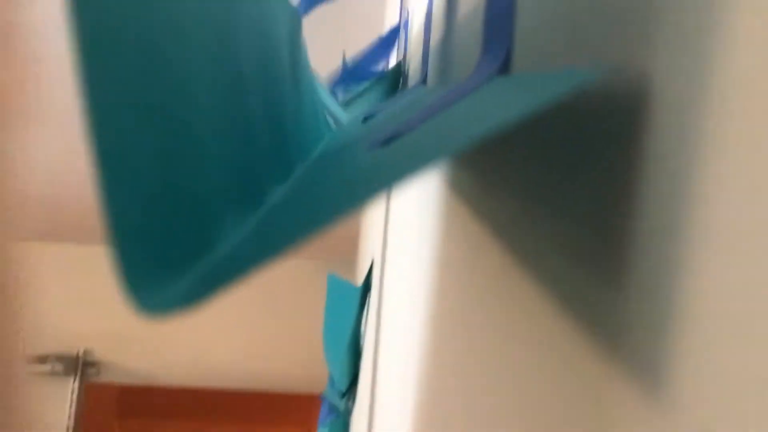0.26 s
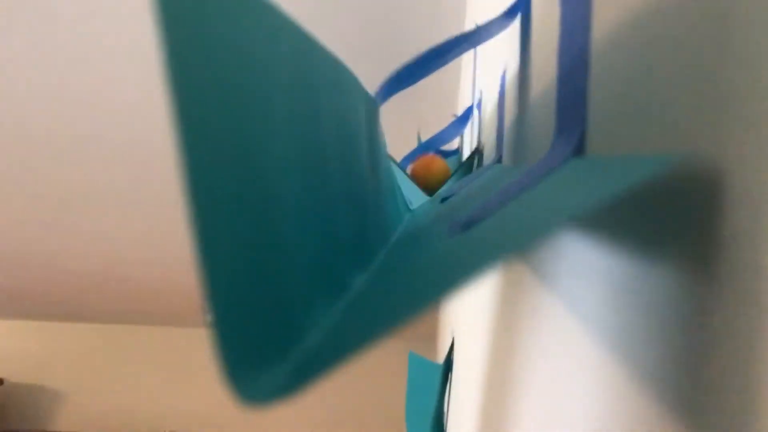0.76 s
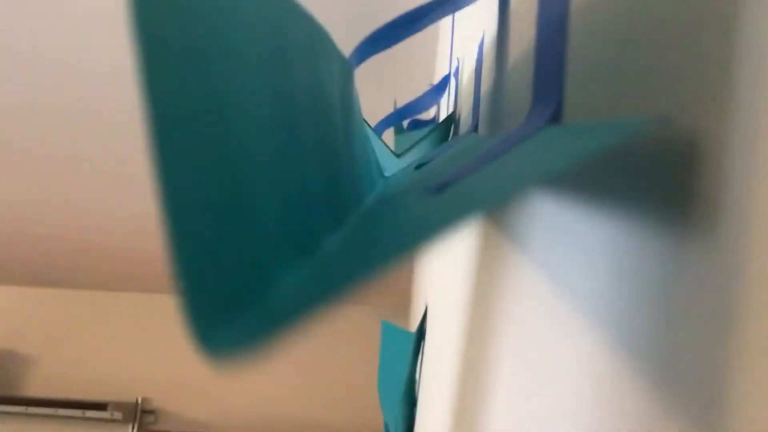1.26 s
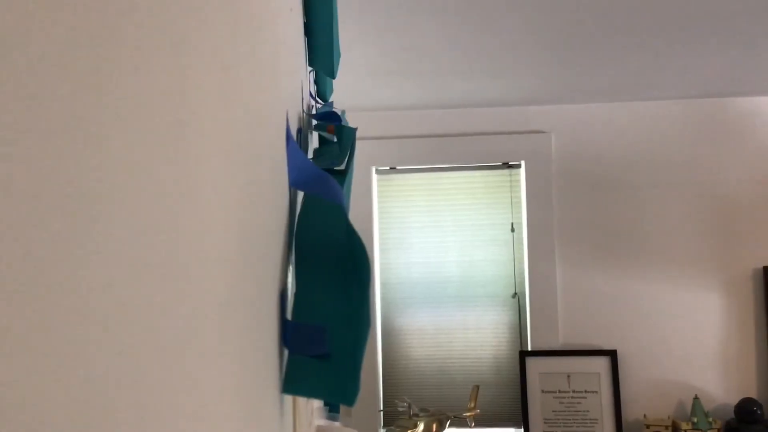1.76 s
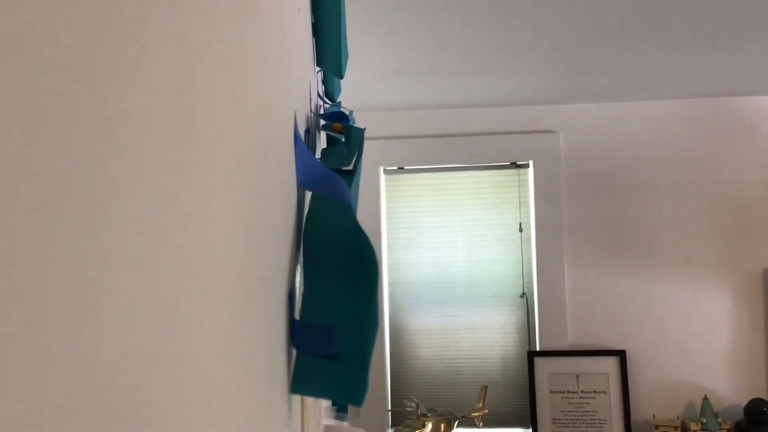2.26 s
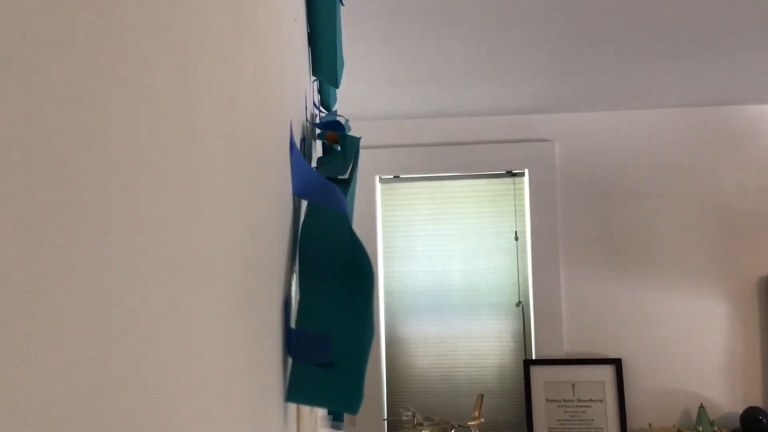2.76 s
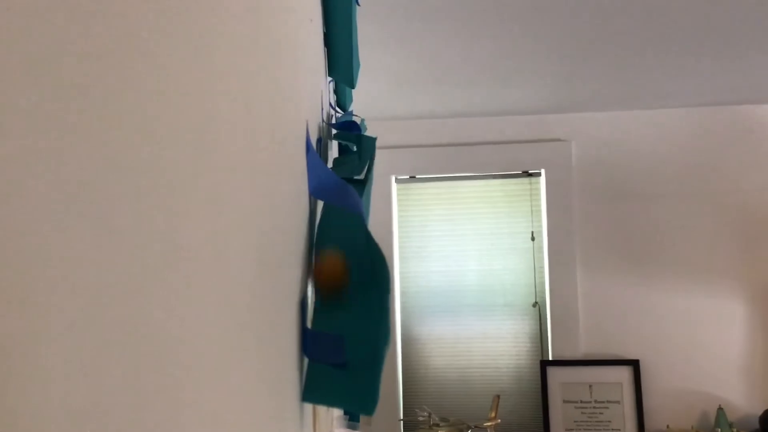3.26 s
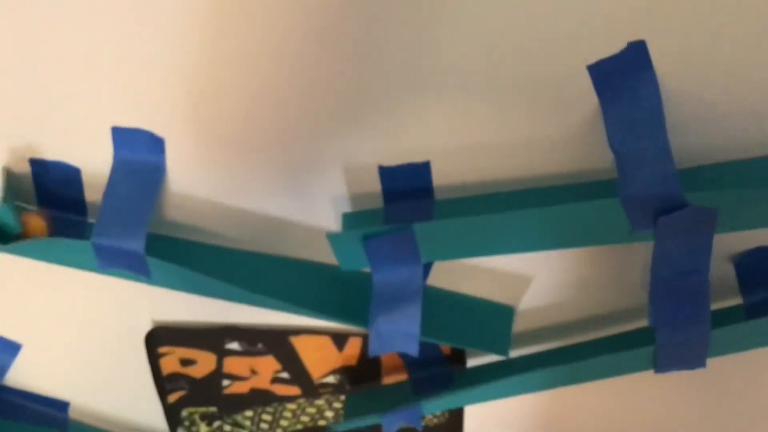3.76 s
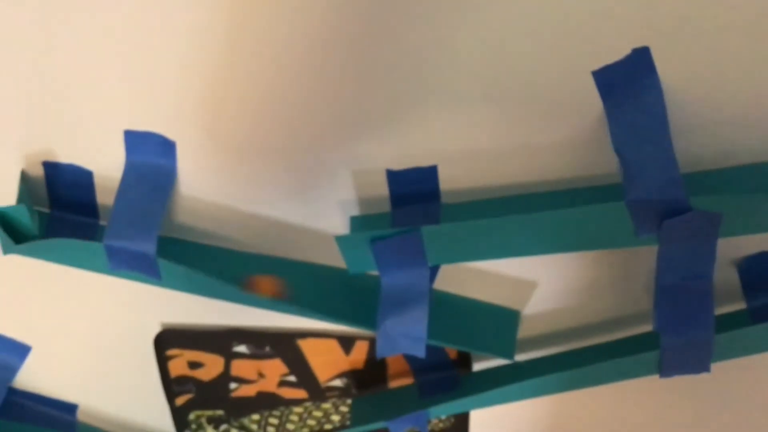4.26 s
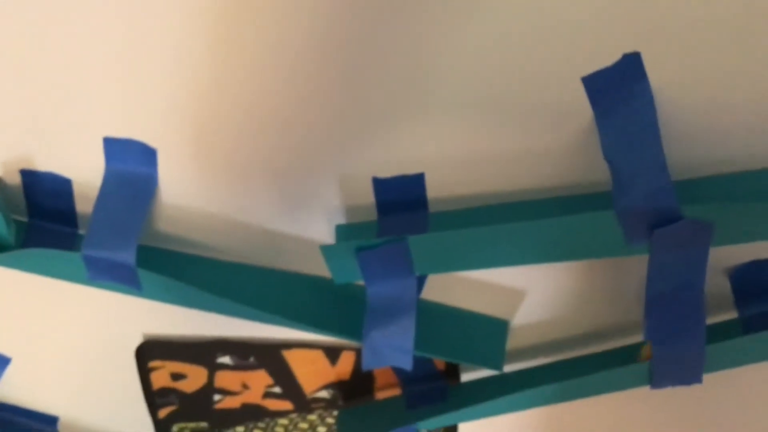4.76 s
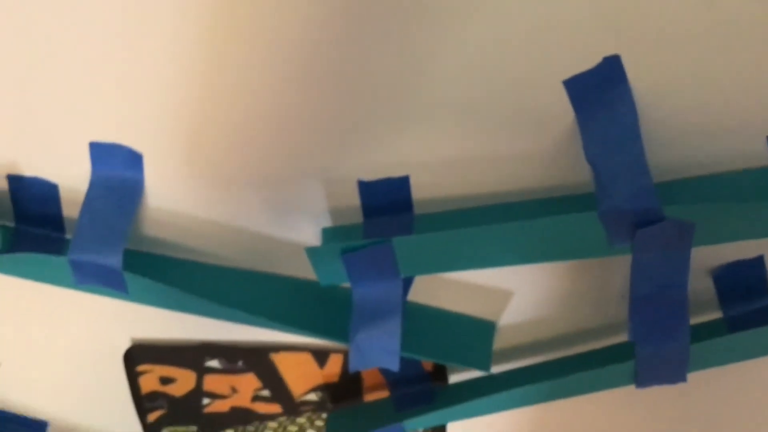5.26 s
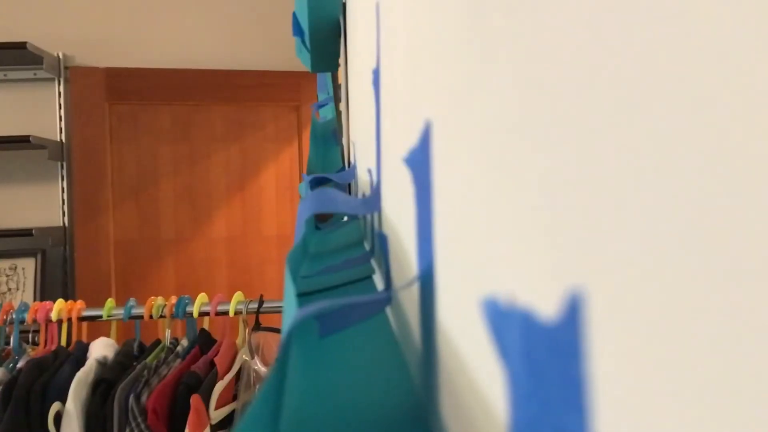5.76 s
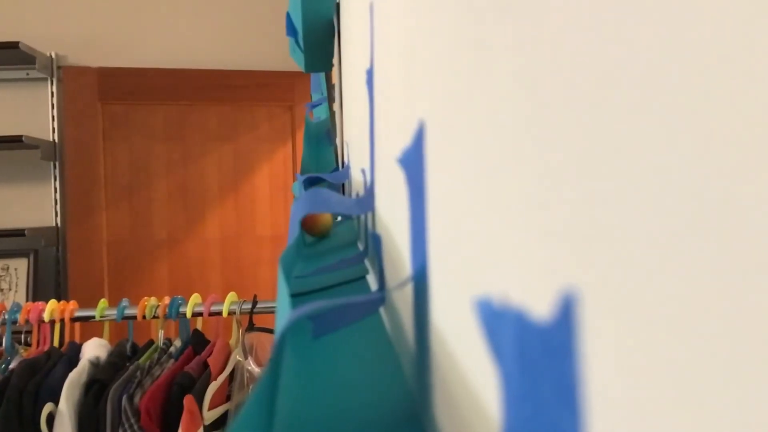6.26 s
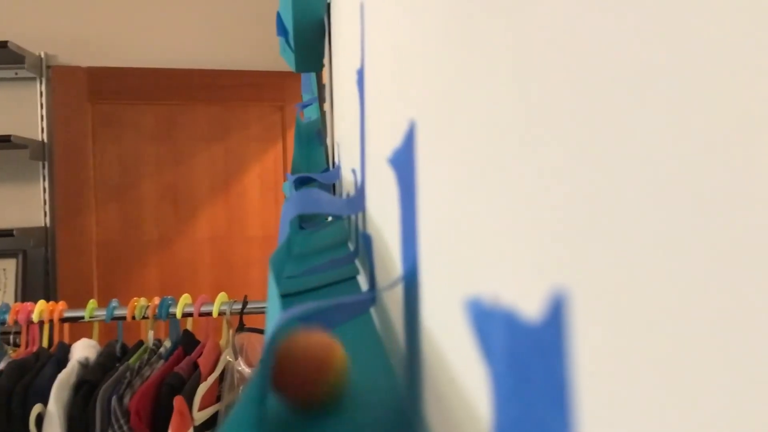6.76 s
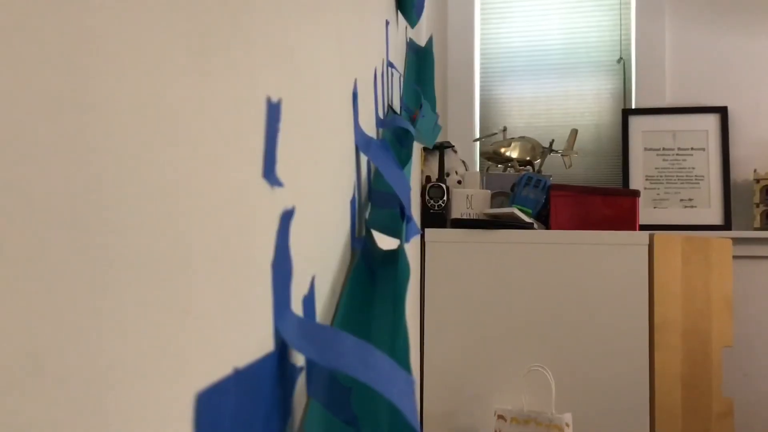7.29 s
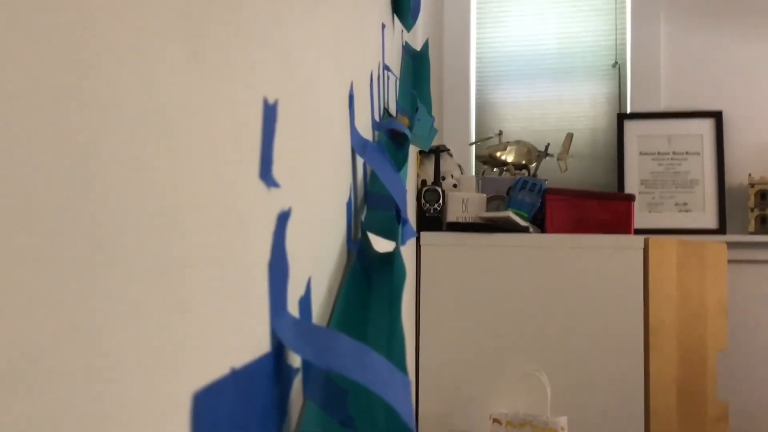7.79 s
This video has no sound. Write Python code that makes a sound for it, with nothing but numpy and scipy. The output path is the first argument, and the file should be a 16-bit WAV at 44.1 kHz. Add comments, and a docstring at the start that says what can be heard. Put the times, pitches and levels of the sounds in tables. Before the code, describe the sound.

A small marble runs down a homemade paper track in a small, dry room. Crisp slaps and pops come first, rolling swells toward the close microphone and ends in a hard knock. After a few more slaps it grows nearly silent, then taps, dense clattering, sparse drops and a last rumbling approach follow. Faint bass air and hum lie beneath.

```python
"""Marble on a paper track

A marble runs down a paper track taped to the wall of a small room, now near, now far from the microphone.
Rolling is coloured noise; folds and lower ramps give noisy slaps; taps, bright pops and a hard knock
at the microphone use fading sine waves. Skids, one faint ringing tap and dull bumps shake a resonance.
Noise for still air and a faint mains hum lie underneath."""
import sys
import numpy as np
from scipy import signal
from scipy.fft import rfft, irfft, next_fast_len
from scipy.io import wavfile
from scipy.ndimage import map_coordinates

SR = 44100
rng = np.random.default_rng(int(sys.argv[2]) if len(sys.argv) > 2 else 0)


def log_audio(samples):
    """Write samples as a 16-bit WAV file to the path given in sys.argv[1]."""
    # one column per channel
    frames = np.atleast_2d(samples).T
    # limit to full scale, then quantise
    limited = np.clip(frames, -1, 1)
    pcm = np.round(limited * 32767).astype(np.int16)
    wavfile.write(sys.argv[1], SR, pcm)


N = 354123  # length in samples

# How loudly the marble rolls, one list of points for each stretch of track.
# Each point: time in seconds, basic rolling level in dB.
ROLL_CURVES = [
    [(0.0, -58.5), (0.16, -81.5), (0.3, -61.5), (0.658, -66.5), (0.856, -62.5), (.93, -56.5), (1.016, -53),
     (1.1, -47.5)],
    [(1.17, -48), (1.204, -68.5), (1.268, -66), (1.586, -65.5), (1.65, -65.5), (1.766, -70.5), (1.816, -77),
     (1.95, -86)],
    [(2.0, -87), (2.276, -80), (2.606, -75), (2.84, -68.5), (2.996, -69.5), (3.058, -65.5), (3.196, -50),
     (3.33, -100)],
    [(3.37, -65.5), (3.5, -76), (3.622, -62), (3.662, -56), (3.748, -69), (3.876, -66.5), (4.02, -78)],
    [(4.06, -76.5), (4.178, -73.5), (4.39, -66), (4.658, -80.5), (4.968, -69.5), (5.11, -68.5),
     (5.242, -65.5), (5.31, -66.5)],
    [(5.36, -69), (5.554, -76.5), (6.032, -70), (6.12, -65.5), (6.385, -70.5), (6.46, -61.5), (6.66, -61),
     (6.852, -54.5), (6.91, -51)],
    [(6.94, -74), (7.09, -64), (7.592, -75.5), (7.8, -69), (7.932, -69), (8.03, -72)],
]
# Tone of each stretch. Each row: rumble of the flexing paper in dB, fibre hiss in dB, both before the level.
STRETCH_TONES = [(4, -8), (4, -7), (4, -7), (-4, -18.5), (1.5, -11.5), (4, -12.5), (1.5, -5)]
# The marble hops or drops and leaves the paper. Each row: start in seconds, end in seconds.
# A row that ends well before it starts has no effect, here and among the panels.
FLIGHT_TIMES = [(1.098, 1.265), (1.383, 1.54), (3.029, 3.21), (3.4, 3.22), (4.435, 4.46), (5.052, 5.12),
                (6.925, 7.2)]
# Panel resonances of the ramp under the marble. Each row: start in seconds, end in seconds, pitch in Hz,
# sharpness (Q), strength of the added ring in dB.
RAMP_PANELS = [(0.736, 1.06, 7900, 2.1, 7), (1.4, 1.801, 620.5, 6.8, -1.5), (4, 4.5, 635, 6.6, -8),
               (2.9, 5.315, 4680, 9.1, 8.5), (3.7, 4.56, 1830, 5.5, -0.5), (4.604, 5.317, 2190, 7.3, 5),
               (2.9, 4.4, 2240, 6.7, -2), (5.424, 5.844, 1100, 2.6, 0), (5.4, 6.742, 5200, 2.4, 3),
               (7, 6.92, 7100, 4.5, -2), (6.6, 8.03, 1460, 8.7, -3.5)]
# The marble slaps into a fold or lands on a ramp. Each row: start in seconds, strength in dB,
# crisp edge in dB, low body in dB, ring of that panel in Hz, time to fade by 60 dB in seconds.
SLAP_EVENTS = [(0.1781, -40.5, 0, -2, 5200, 0.075), (0.2116, -27, 1.5, -5.5, 5550, 0.041),
               (.2304, -38, -1, -1, 4800, .04), (0.2427, -33.5, -3, -5, 2730, .06),
               (0.3261, -40, 1, 1.5, 5330, 0.055), (0.381, -51.5, 5.5, -9, 5700, 0.044),
               (.429, -50.5, 1, 0, 2700, 0.069), (.568, -51, 3.5, -8, 4100, 0.04),
               (0.668, -51.5, 4.5, -18, 5000, .06), (0.7968, -37.5, 0, -4, 5230, 0.074),
               (1.1947, -35.5, 4, -2, 5700, 0.046), (1.1984, -27, -8, 2, 3130, 0.05),
               (1.4191, -41, -3, -6.5, 3700, .06), (1.4232, -31, -7, -6, 1500, .05),
               (1.431, -33.5, -2, -4, 3900, 0.093), (1.5493, -44.5, -4, -1, 4330, 0.064),
               (1.6008, -33, -0.5, -2, 4400, 0.057), (1.6933, -47.5, -2, -2.5, 4600, 0.16),
               (2.7339, -52, 3, -3, 3500, 0.047), (3.088, -44, -3, -0.5, 2020, 0.067),
               (3.13, -50, 5.5, -4, 5020, 0.13), (3.2435, -44, -4.5, -9, 5000, 0.065),
               (3.2595, -46.5, -2, -2, 4800, 0.045), (3.3522, -57, -1, 5.5, 2500, 0.038),
               (3.43, -22, -7, -4, 2120, 0.056), (3.497, -42.5, -8, -2.5, 1550, 0.088),
               (3.5651, -32, -8.5, -3, 1800, 0.065), (3.578, -40, -16, 3, 1500, 0.04),
               (3.5895, -32.5, -18, -3.5, 1600, 0.08), (3.6183, -31.5, -17, -2, 2120, 0.044),
               (3.6832, -43, 0, -11, 4300, 0.071), (3.698, -38, 3, -3, 4080, 0.05),
               (3.709, -35.5, -7, -2, 2120, .07), (3.7392, -29, -2.5, -10.5, 4380, 0.053),
               (3.7553, -41.5, -6, -8, 2060, 0.072), (3.7809, -34, -1, -5.5, 4420, 0.048),
               (3.8256, -40, -2.5, -2.5, 4110, 0.099), (3.869, -40, -1.5, -5, 4570, 0.068),
               (4.0699, -50, -3.5, -5.5, 4130, 0.057), (4.1885, -45.5, -8.5, -4, 1840, .05),
               (4.246, -50.5, -6, -2, 1756, 0.055), (4.461, -29, -10, -4.5, 2054, 0.066),
               (4.5438, -48.5, -8, -1, 2050, 0.094), (4.616, -53.5, -4, -2, 4800, 0.049),
               (4.7366, -49.5, -4.5, -10.5, 1810, .06), (4.7625, -53.5, 3.5, -8.5, 4650, .045),
               (5.1312, -32.5, -5, -5.5, 2240, 0.057), (5.141, -22.5, -15.5, -10, 2175, 0.045),
               (5.153, -28, -2.5, -4.5, 2240, 0.026), (5.17, -53, 1, -1, 2150, 0.38),
               (5.2569, -34.5, -4.5, -5, 2250, 0.062), (5.676, -51.5, -5.5, -0.5, 1406, 0.056),
               (6.4, -54, -9, 2, 4500, 0.058), (6.754, -45, 2, 1, 4500, 0.035),
               (6.7939, -41, -4.5, 2, 1200, 0.043), (6.8425, -35.5, -8, 2.5, 1560, 0.045),
               (6.8697, -38.5, -7, -3, 1845, 0.044), (6.9926, -36, -1, -5, 3400, 0.088),
               (6.9987, -32, -4.5, -4.5, 3360, 0.11), (7.1432, -44, -9, -6, 2255, 0.076),
               (7.303, -49.5, -2, 2, 1430, .04), (7.316, -50, -4, 2, 2300, 0.038),
               (7.171, -54.5, -3, -5.5, 2300, 0.073), (7.24, -64, -4, -6, 3500, 0.056),
               (5.025, -57, 2, -6, 2200, .07), (.305, -48, 3, -8, 5200, 0.041),
               (7.9615, -58.5, 7.5, -2, 4000, 0.053), (7.98, -43.5, 1.5, -6.5, 3240, 0.054)]
# The marble taps paper lying firmly on the wall. Each row: start in seconds, strength in dB, starting pitch in Hz.
TAP_EVENTS = [(1.2472, -35.5, 1750), (2.785, -27, 2980), (2.9058, -35.5, 2740), (3.1997, -40, 1880),
              (3.37, -47.5, 2940), (8.0069, -26, 2750)]
# Creases pop under the marble; the rows at 2.785 s and 8.007 s are the bright tick that starts a tap.
# Each row: start in seconds, peak in dB before the room, pitch in Hz.
POP_EVENTS = [(.178, -34, 6400), (0.213, -15, 4300), (0.3038, -35, 7000), (0.3434, -38, 6500),
              (0.605, -48, 5960), (0.6393, -48, 6000), (0.796, -32, 5300), (.809, -27, 4970),
              (.86, -43, 8000), (1.1999, -19.5, 4350), (1.6025, -29.5, 4418), (3.636, -43, 6000),
              (6.615, -43, 6050), (6.7543, -45, 6000), (6.8439, -32, 4500), (7.0998, -45, 7000),
              (7.3027, -42, 6960), (7.374, -55, 5990), (7.8321, -52.5, 6570), (2.785, -37.5, 3900),
              (4.6165, -51, 4590), (4.664, -48, 4030), (8.007, -31, 3870)]
# Skids of the marble on the paper, and one faint ringing tap at 7.477 s.
# Each row: start in seconds, strength in dB, pitch in Hz, 60 dB fade in seconds.
SKIDS_AND_FAINT_TAP = [(.768, -46.5, 6100, 0.094), (.872, -46, 7040, 0.054), (1.222, -51, 6980, 0.12),
                       (3.15, -56, 5840, 0.1), (3.686, -47, 10800, 0.092), (7.477, -55.5, 1420, 0.07),
                       (7.719, -50.5, 6900, 0.022)]
# Dull bumps. Each row: start in seconds, strength in dB, pitch in Hz, 60 dB fade in seconds.
BUMP_EVENTS = [(.233, -35, 227, 0.077), (.306, -43, 245, 0.054), (.79, -40, 253, 0.18),
               (.812, -43, 113.5, 0.28), (1.017, -30.5, 174.6, 0.16), (1.119, -29.5, 405, 0.076),
               (1.2, -26, 210, 0.042), (2.447, -37.5, 214.8, 0.26), (2.463, -39, 480, 0.17),
               (2.46, -48, 990, 0.11), (3.578, -41.5, 301.5, .1), (2.788, -42, 737, .07),
               (4.188, -47.5, 331, .039), (4.463, -40, 400, 0.084), (5.141, -32.5, 382, 0.048),
               (5.258, -36.5, 390, 0.064), (5.337, -55, 339.3, 0.13), (6.025, -40, 179.3, 0.056),
               (6.095, -50, 175, 0.14), (6.172, -49, 231, .05), (6.415, -47, 125.3, 0.1),
               (6.46, -49, 130, 0.06), (6.536, -43.5, 168, 0.058), (6.568, -44, 259, 0.13),
               (6.69, -43, 104, 0.15), (6.73, -35, 138, 0.079), (6.797, -39, 330, 0.075),
               (6.846, -34.5, 139.5, 0.17), (7.66, -54, 260, 0.071), (7.668, -42.5, 72, 0.29),
               (7.779, -49.5, 427, .05)]
# Tones of the hard knock at the microphone. Each row: pitch in Hz, strength in dB.
KNOCK_TONES = [(68, -19), (128, -11), (275, -5.5), (570, 3), (740, -0.5), (980, -4.5), (1560, -10),
               (1900, -5), (2740, -8), (3800, -4), (5400, -4.5), (7100, -6.5), (8300, -2.5), (10600, -21),
               (15000, -18)]
# Colour of a slap. Each row: frequency in Hz, filter gain in dB.
SLAP_COLOUR = [(41, -35), (70, -3.5), (344, -2), (700, -2), (880, -9), (1150, -10), (1550, -8), (2220, -7),
               (2600, -10.5), (3100, -14), (3900, -11.5), (4690, -12.5), (6450, -18.5), (10200, -24.5),
               (12800, -27.5), (16000, -28.5)]
# Colour of rolling. Each row: frequency in Hz, filter gain in dB.
ROLLING_COLOUR = [(31, -44.5), (52, -13.5), (157, -6.5), (292, -10), (354, -6.5), (419, -15), (660, -12),
                  (880, -18), (1420, -20.5), (2190, -22), (6280, -29.5), (16000, -47.5)]
# Colour of still air. Each row: frequency in Hz, filter gain in dB.
AIR_COLOUR = [(25, -31), (50, -12), (75, -4.5), (120, -7), (200, -13), (300, -17.5), (500, -29.5),
              (1000, -35.5), (2500, -41), (6000, -46.5), (10000, -45.5), (16000, -53.5)]
# How long the room rings. Each row: frequency in Hz, 60 dB fade in seconds.
ROOM_FADES = [(100, .35), (500, 0.3), (2500, 0.3), (6000, 0.39), (14000, 0.26)]
# Level of air and hum over time. Each row: time in seconds, gain in dB.
BACKGROUND_LEVELS = [(3.3, 0), (3.449, -1.5), (6.9, -0.5), (7.0, -6)]
# The level dips briefly. Each row: centre in seconds, half width in seconds, gain at the centre in dB.
LEVEL_DIPS = [(1.267, 0.014, -20), (5.324, 0.0076, -24.5), (6.942, 0.018, -21)]

# Rolling
RUB_DB = 1  # gain of the whole rolling sound over its basic level
RUMBLE_GROWS, PIVOT_DB = 1.15, -65  # dB of rumble per dB of rolling, about this level
FLIGHT_DB, LIFT_OFF_S = -13, 0.066  # rolling changes by this much in flight, with a fade this long
SWELL_DB, SWELLS_PER_S = 0.58, 11  # the marble weaves from wall to wall

# Slaps
SLAP_DB = -5  # gain of every slap
RATTLE_DB, RATTLE_T60_S = -25, 0.18  # loose paper rattles on after a slap
REBOUND_S, REBOUND_DB = 0.0096, -10  # the sheet springs back against the marble
PANEL_DB = -1  # the panel's ring, relative to the slap

# Small contacts on the way
TICKS_PER_S, TICK_DB, TICK_SPREAD_DB = 14, 9, 3.5  # strength over the rolling level, plus or minus the spread
TICK_HZ, TICK_PITCH_SPREAD = 2000, 0.45  # each rings a different panel; spread in natural-log units
TICK_EDGE_DB, TICK_BODY_DB = 0, -2.5  # crisp edge and low body
TICK_T60_S = .025  # light contacts die sooner than slaps

# The sheet's many weak modes swell and fade as the marble moves along it
MODES_LOW_HZ, MODES_HIGH_HZ, MODE_Q = 467, 7230, 6.8
MODE_CHANGES_PER_S = 7
ROLL_SWING, SLAP_SWING = 0.32, 0.22  # how much the modes colour the rolling and the slaps

# Taps, pops and soft-edged strokes
TAP_FALL_S, TAP_T60_S = 0.00432, 0.015  # time scale of the falling pitch, fade
ECHO_DB, ECHO_T60_S = -6, 0.043  # scatter in the wall after a tap
POP_T60_S, CRACKLE_T60_S, CRACKLE_DB = .0022, 0.0059, -10
RISE_SHARE = 0.077  # the longer a stroke lasts, the softer it starts

TOP_HZ = 16200  # band limit of the recorder


def amp(db):
    """Turn decibels into gain."""
    return 10 ** (np.asarray(db) / 20)


def unit(x):
    """Scale x to an average power of one (rms 1)."""
    return x / np.sqrt(np.mean(x ** 2) + 1e-20)


def along(points, hz):
    """Read (Hz, value) points on a log frequency axis."""
    point_hz, values = np.transpose(points)
    return np.interp(np.log(hz + 1), np.log(point_hz + 1), values)


def clock(count):
    """Time of each sample in seconds."""
    return np.arange(count) / SR


def dying(t, t60):
    """Fade exponentially, reaching 60 dB down at t60 seconds."""
    return np.exp(-np.log(1000) * t / np.maximum(t60, 1e-4))


def during(start, end, fade_s):
    """Give 1 between two times and 0 outside, with short fades."""
    t = clock(N)
    inside_s = np.minimum(t - start, end - t)
    return np.clip(inside_s / fade_s + .5, 0, 1)


def wobble(rate, count=N):
    """Draw a smooth random curve through rate random points a second."""
    points = rng.standard_normal(int(count * rate / SR) + 4)
    return map_coordinates(points, [clock(count) * rate])


def add(track, s, sound):
    """Mix a sound into the track at s seconds, cutting it at the track's end."""
    part = track[max(round(s * SR), 0):][:len(sound)]
    part += sound[:len(part)]


def coloured(x, spectrum):
    """Filter x to the given (Hz, dB) shape without any sound ahead of its cause."""
    m = 2 * next_fast_len(len(x))
    gain = amp(along(spectrum, np.fft.rfftfreq(m, 1 / SR)))
    # folding the cepstrum forward in time makes the filter minimum phase
    cepstrum = irfft(np.log(gain + 1e-6))
    cepstrum[1:m // 2] *= 2
    cepstrum[m // 2 + 1:] = 0
    return irfft(rfft(x, m) * np.exp(rfft(cepstrum)))[:len(x)]


def resonance(x, hz, q):
    """Pass x through one resonance; a higher q rings longer."""
    b, a = signal.iirpeak(min(hz, SR / 3), max(q, 1), fs=SR)
    return signal.lfilter(b, a, x)


def registers(x, low_hz, high_hz):
    """Split x into its low, middle and high part."""
    bands = [(low_hz, "low"), ([low_hz, high_hz], "band"), (high_hz, "high")]
    return [signal.sosfilt(signal.butter(3, hz, kind, fs=SR, output="sos"), x) for hz, kind in bands]


def grains(count, per_second, smooth):
    """Make tiny random contacts over a smooth share of noise, at rms 1."""
    hits = (rng.random(count) < per_second / SR) * rng.standard_normal(count)
    return unit(unit(hits) + smooth * rng.standard_normal(count))


def rolling_level():
    """Level of the rolling in dB; it falls away while the marble is in the air."""
    airborne = sum(during(start, end, LIFT_OFF_S) for start, end in FLIGHT_TIMES)
    seconds, level_db = np.transpose(np.concatenate(ROLL_CURVES))
    return np.interp(clock(N), seconds, level_db) + FLIGHT_DB * airborne


def rolling(level_db):
    """The marble rides over the grain of the paper; the sheet flexes under it in lumps."""
    ends = [point[0] for stretch in ROLL_CURVES for point in (stretch[0], stretch[-1])]
    rumble_db, fibre_db = [np.interp(clock(N), ends, np.repeat(db, 2)) for db in np.transpose(STRETCH_TONES)]
    rumble_db = rumble_db + (RUMBLE_GROWS - 1) * (level_db - PIVOT_DB)
    force = amp(1.1 * wobble(130))
    swell = amp(SWELL_DB * wobble(SWELLS_PER_S))
    creases = .38 * grains(N, per_second=30, smooth=0)  # the odd sharper tick
    grain = grains(N, per_second=3400, smooth=0.93)
    paper = coloured(force * (grain + creases), ROLLING_COLOUR)
    rumble, rub, fibre = map(unit, registers(paper, low_hz=930.0, high_hz=3550))
    lumps = unit(amp(3 * wobble(60)))
    lower = swell * (amp(rumble_db) * lumps * rumble + rub)
    hiss = np.sqrt(swell) * amp(fibre_db) * fibre  # the hiss swells less
    return amp(level_db + RUB_DB) * (lower + hiss)


def slap(edge_db, body_db, ring_hz, t60):
    """One contact snaps the paper, which springs back and chatters against marble and wall while its panel rings."""
    t = clock(count=8192)
    give = 1 - np.exp(-t / 0.00067)  # the paper yields before it snaps
    snap = give * (dying(t, t60) + 0.97 * dying(t, 0.0099))
    rebound = np.interp(t - REBOUND_S * rng.uniform(.8, 1.2), t, snap)
    envelope = np.hypot(snap, amp(REBOUND_DB) * rebound)
    rattle = amp(RATTLE_DB) * grains(len(t), per_second=400, smooth=0) * dying(t, RATTLE_T60_S)
    sheet = coloured(grains(len(t), per_second=5000, smooth=0.5) * envelope + rattle, SLAP_COLOUR)
    sheet = sheet + amp(PANEL_DB) * resonance(sheet, ring_hz, q=6.7)

    def chattering(part):
        """After the snap each register chatters in its own way."""
        return unit(part * amp(3.5 * wobble(220, count=len(t)) * (1 - dying(t, .06))))

    body, middle, edge = [chattering(part) for part in registers(sheet, low_hz=900, high_hz=3600)]
    size = amp(SLAP_DB) * np.sqrt(np.mean(envelope ** 2))
    return size * (amp(body_db) * body + middle + amp(edge_db - 2.1) * edge)


def contacts():
    """The marble hits the folds and lands on lower ramps, each time with a slap of the sheet."""
    out = np.zeros(N)
    for s, db, edge_db, body_db, ring_hz, t60 in SLAP_EVENTS:
        add(out, s, amp(db) * slap(edge_db, body_db, ring_hz, t60))
    return out


def ticks(level_db):
    """Small chance contacts with the side walls grow and shrink with the rolling."""
    out = np.zeros(N)
    for when, force, pitch in rng.random((round(TICKS_PER_S * N / SR), 3)):
        at = int(when * N)
        db = level_db[at] + TICK_DB + TICK_SPREAD_DB * (2 * force - 1)
        ring_hz = TICK_HZ * np.exp(TICK_PITCH_SPREAD * (2 * pitch - 1))
        add(out, at / SR, amp(db) * slap(TICK_EDGE_DB, TICK_BODY_DB, ring_hz, TICK_T60_S))
    return out


def ramps(x, coupling_db):
    """The folded paper under the marble rings along with whatever shakes it."""
    ringing = 0
    for start, end, hz, q, db in RAMP_PANELS:
        ringing = ringing + amp(db + coupling_db) * resonance(during(start, end, .05) * x, hz, q)
    return x + ringing


def wandering(x, swing):
    """Every spot of the sheet favours other modes, so the colour drifts under the moving marble."""
    modes = np.geomspace(MODES_LOW_HZ, MODES_HIGH_HZ, 22)
    drift = sum(wobble(MODE_CHANGES_PER_S) * resonance(x, hz, MODE_Q) for hz in modes)
    return (x + swing * drift) / np.hypot(1, swing)


def taps():
    """On firm backing the high bending waves arrive first, so the pitch drops at once; scattered echoes follow."""
    out, t = np.zeros(N), clock(count=4096)
    for s, db, hz in TAP_EVENTS:
        cycles = hz * t / (1 + t / TAP_FALL_S)
        wave = np.sin(2 * np.pi * cycles) * (1 - np.exp(-hz * t)) * dying(t, TAP_T60_S)
        scatter = grains(len(t), per_second=1500, smooth=.3) * dying(t, ECHO_T60_S) * (1 - dying(t, .03))
        echoes = signal.fftconvolve(wave, scatter / np.linalg.norm(scatter))[:len(t)]
        add(out, s, amp(db) * (wave + amp(ECHO_DB) * echoes) / np.abs(wave).max())
    return out


def pops():
    """A popping crease, or the bright tick that starts a tap: a very short sine wave and a tiny crackle."""
    out, t = np.zeros(N), clock(count=1024)
    for s, db, hz in POP_EVENTS:
        crackle = resonance(rng.standard_normal(len(t)), 1.3 * hz, q=1) * dying(t, CRACKLE_T60_S)
        pop = np.sin(2 * np.pi * hz * t) * dying(t, POP_T60_S) + amp(CRACKLE_DB) * crackle
        add(out, s, amp(db) * pop / np.abs(pop).max())
    return out


def knock():
    """One hard blow at the microphone: a burst of noise and fading tones, the high ones dying first."""
    out, t = np.zeros(N), clock(count=8192)
    noise = unit(coloured(rng.standard_normal(len(t)), SLAP_COLOUR))
    blow = amp(-27.5) * noise * dying(t, 0.035)
    for k, (hz, db) in enumerate(KNOCK_TONES):
        t60 = .016 * (570 / hz) ** .66
        tone = np.sin(2 * np.pi * hz * t) * (1 - np.exp(-3 * hz * t)) * dying(t, t60)
        blow = blow + (-1) ** (k + 1) * amp(db) * tone  # neighbours swing in opposite directions
    add(out, 1.1312, blow)
    return out


def strokes(rows, q, ring):
    """Soft-edged strokes each shake one well-damped resonance; ring is its clean swing over the rough part."""
    out, t = np.zeros(N), clock(count=16384)
    for s, db, hz, t60 in rows:
        rise = 1 - np.exp(-t / max(RISE_SHARE * t60, 1e-4))
        envelope = rise * dying(t, t60)
        noise = rng.standard_normal(len(t)) * envelope
        shake = resonance(resonance(noise, hz, q), hz, q)
        swing = envelope * np.sin(2 * np.pi * hz * t + wobble(hz / 4, count=len(t)))
        size = amp(db + 3.5) * np.sqrt(np.mean(envelope ** 2))
        add(out, s, size * unit(unit(shake) + ring * unit(swing)))
    return out


def skids_and_faint_tap():
    """Skids on the paper and one faint ringing tap: noise around one pitch with a weaker clean swing."""
    return strokes(SKIDS_AND_FAINT_TAP, q=1.9, ring=.3)


def bumps():
    """Dull bumps: a blunt push with a strong clean swing."""
    return strokes(BUMP_EVENTS, q=1.4, ring=0.82)


def room(x):
    """Each frequency dies at its own speed in the room, and the echoes change as the marble moves on."""
    out, hop = np.zeros(N), SR // 8
    for start in range(0, N, hop):
        hz, t, z = signal.stft(rng.standard_normal(SR // 2), SR, nperseg=256)
        tail = signal.istft(z * dying(t, along(ROOM_FADES, hz)[:, None]), SR, nperseg=256)[1]
        tail = tail * (1 - np.exp(-clock(len(tail)) / 0.0017))  # the echoes build up softly
        add(out, start / SR, signal.fftconvolve(x[start:start + hop], tail / np.linalg.norm(tail)))
    return out


def still_air():
    """Still air is steady noise with most of its strength in the bass."""
    return amp(-66.5) * unit(coloured(rng.standard_normal(N), AIR_COLOUR))


def mains_hum():
    """The mains hum is one low sine wave, slightly unsteady in pitch and level."""
    hum = np.sin(2 * np.pi * 119.5 * clock(N) + .35 * wobble(4))
    return amp(-62.5 + 0.72 * wobble(5.4)) * hum


def background():
    """Air and hum share a level that is weaker at the later microphone positions."""
    level_db = np.interp(clock(N), *np.transpose(BACKGROUND_LEVELS))
    return (still_air() + mains_hum()) * amp(level_db)


def scene():
    """Mix track, room and background into one channel."""
    level_db = rolling_level()
    roll = ramps(rolling(level_db), coupling_db=0.0)
    hits = ramps(contacts() + ticks(level_db), coupling_db=-10)  # the marble's blow damps the panels
    track = wandering(roll, ROLL_SWING) + wandering(hits, SLAP_SWING) + taps() + pops()
    blow = knock()
    direct = blow + bumps() + skids_and_faint_tap() + background()
    close = amp(-41) * blow  # so near that the room hardly counts
    mix = track + direct + room(amp(-11) * track + close)
    dip_db = sum(db * np.exp(-((clock(N) - s) / width) ** 4) for s, width, db in LEVEL_DIPS)
    return (mix * amp(dip_db))[None]


def record(dry):
    """The recorder clips at full scale, then cuts steeply above its band limit."""
    m = next_fast_len(N + SR // 2)
    keep = 1 / np.sqrt(1 + (np.fft.rfftfreq(m, 1 / SR) / TOP_HZ) ** 160)
    return irfft(rfft(np.clip(dry, -1, 1), m) * keep, m)[..., :N]


dry = scene()
out = record(dry)
log_audio(out)
```